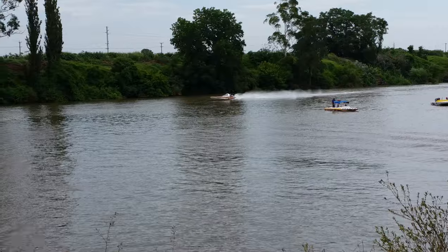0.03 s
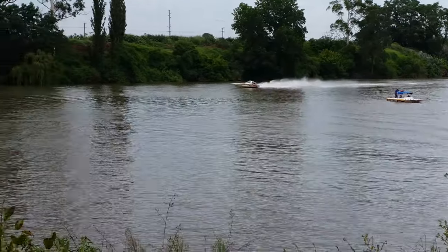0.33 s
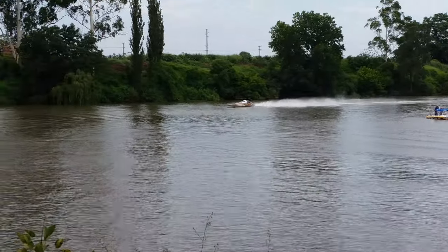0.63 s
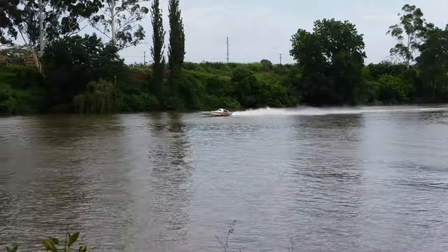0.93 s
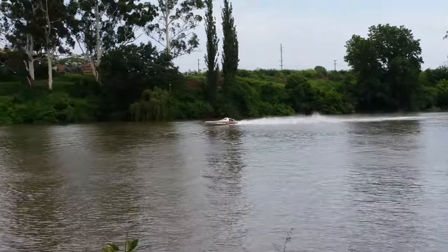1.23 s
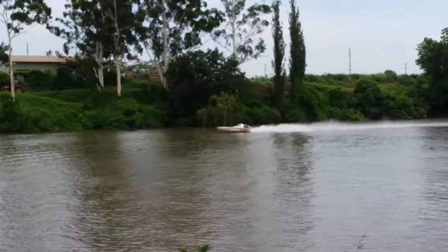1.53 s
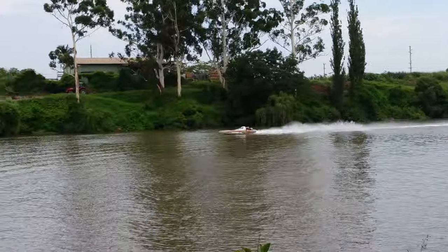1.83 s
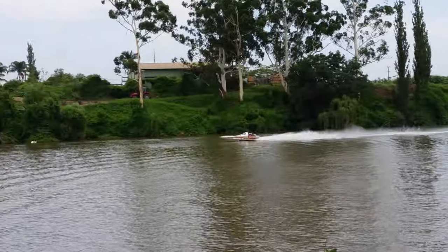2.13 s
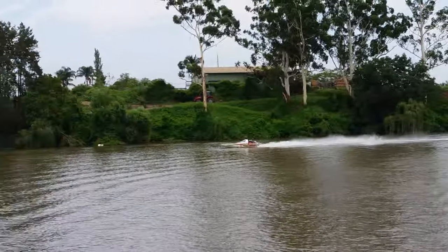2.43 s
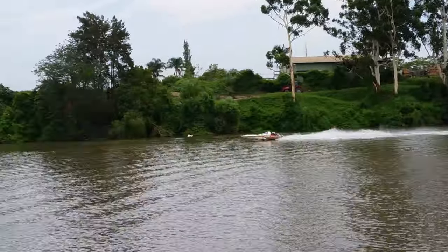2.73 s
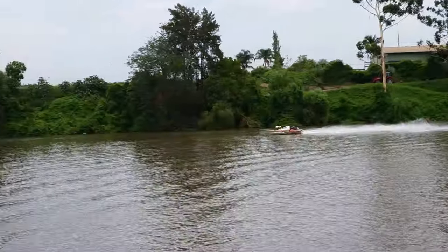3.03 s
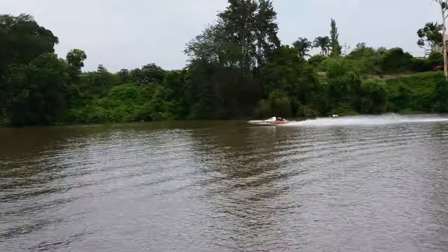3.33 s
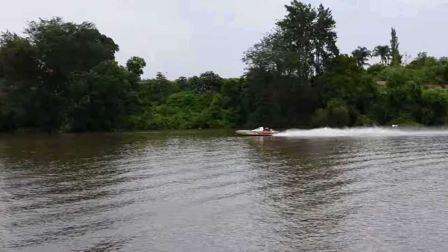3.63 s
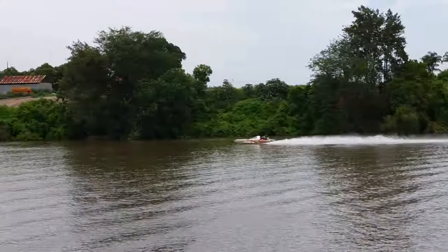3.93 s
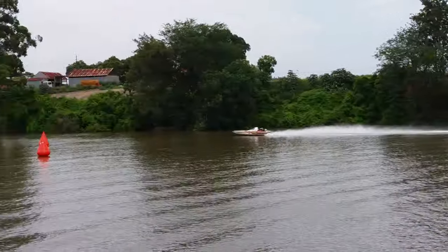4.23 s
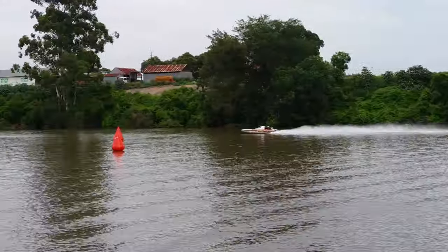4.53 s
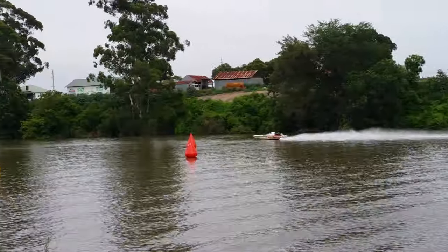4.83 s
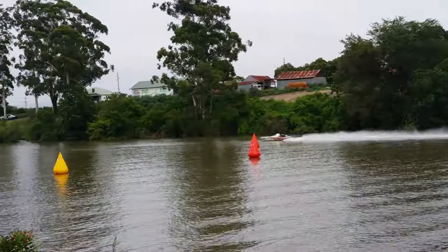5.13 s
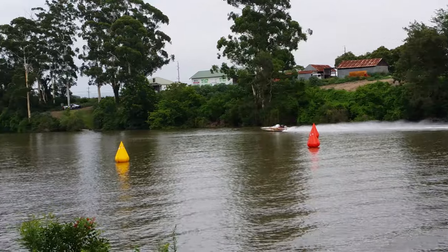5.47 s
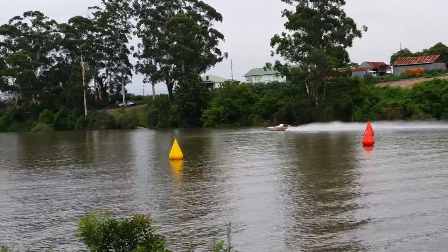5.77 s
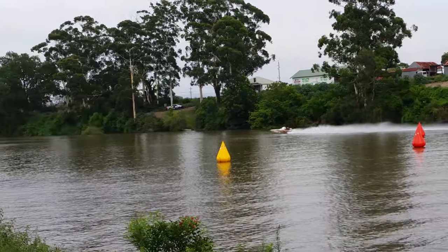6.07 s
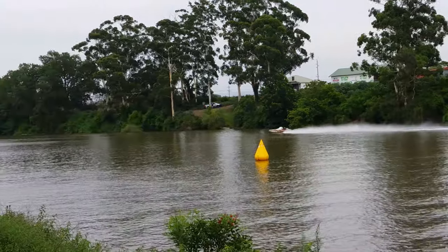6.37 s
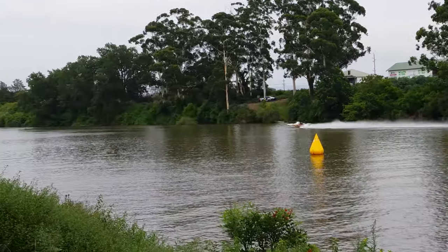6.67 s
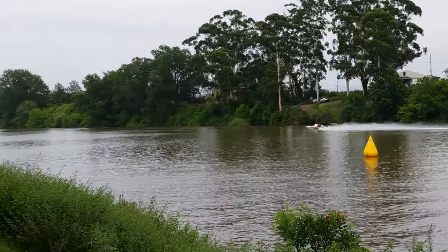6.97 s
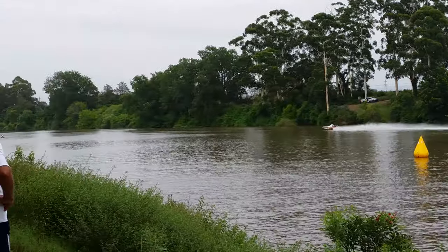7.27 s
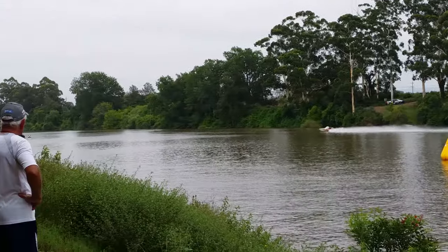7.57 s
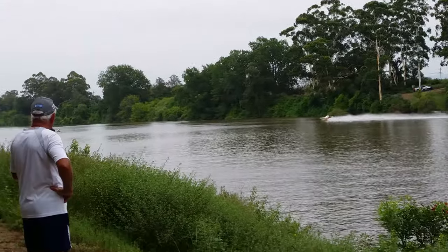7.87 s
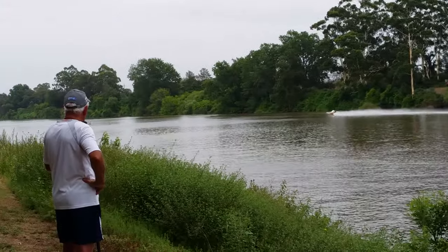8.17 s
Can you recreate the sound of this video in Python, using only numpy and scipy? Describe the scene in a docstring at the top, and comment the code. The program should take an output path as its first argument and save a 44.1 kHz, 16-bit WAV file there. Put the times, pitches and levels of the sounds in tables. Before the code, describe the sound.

After a brief silence, the deep drone of a speedboat's V8 engine rises quickly and stays loud. The open exhausts bark and crackle, and the pitch jumps and dips whenever the propeller leaves the water and bites again. The boat passes midway with a hard blare, throbs and surges, then drops slightly in pitch as it runs on. The riverbank microphone picks up a light echo and a faint rumble of wind.

```python
"""A deep V8 drone swells in and hardens to a blare as a supercharged racing boat runs flat out past a
river bank. Eight open exhaust stacks bark in turn, their colour turning from bow to beam to stern.
The revs race and sag as the hull skips and the propeller leaves the water and bites again.
The exhaust jets tear into a rasping, sizzling crackle that flares on the breeze,
and a faint rumble of wind lies underneath."""
import sys
import numpy as np
from scipy import signal
from scipy.fft import irfft
from scipy.io import wavfile
from scipy.ndimage import uniform_filter1d

SR = 44100
rng = np.random.default_rng(int(sys.argv[2]) if len(sys.argv) > 2 else 0)


def waveform_to_disk(signal):
    """Save audio, clipped to [-1, 1], as 16-bit WAV at the path in sys.argv[1]."""
    frames = np.transpose(np.atleast_2d(signal))
    scaled = np.clip(frames, -1, 1) * 32767
    samples = np.round(scaled).astype(np.int16)
    wavfile.write(sys.argv[1], SR, samples)


N = 366030
TIME = np.arange(N) / SR
TAPS = 8192
BINS = np.fft.rfftfreq(TAPS, 1 / SR)

# side of the boat that faces the bank (time [s], aspect [-1 bow, 0 beam, 1 stern])
ASPECT = [(1.5, -1.15), (2.9, -0.76), (4.3, 0), (7.0, 1)]
# hard surges of the blare (time [s], length [s], boost [dB])
SURGES = [(5.1,.08,3.5),(5.6,0.074,3),(6.05,.09,3.5),(6.51,0.038,4.5)]


def amp(db):
    """Decibels to amplitude."""
    return 10 ** (np.asarray(db) / 20)


def unit_rms(x):
    """Scale to an RMS of one."""
    return x / np.sqrt(np.mean(x ** 2) + 1e-20)


def curves(rows):
    """Each column of a time table at every sample."""
    times, *columns = np.transpose(rows)
    return [np.interp(TIME, times, column) for column in columns]


def spectrum(points):
    """Join points on a log-frequency axis."""
    hz, value = np.transpose(points)
    return np.interp(np.log(BINS + 1), np.log(hz + 1), value)


def smooth(x, size):
    """Two running means of `size` samples."""
    return uniform_filter1d(uniform_filter1d(x, size), size)


def sway(size):
    """Random drift, smoothed over `size` samples."""
    return unit_rms(smooth(rng.standard_normal(N), size))


def noise_pair(apart):
    """White noise, partly shared between left and right."""
    noise = rng.standard_normal((3, N))
    return unit_rms(noise[0] + apart * noise[1:])


def swells(rows, attack_s=0.024):
    """Summed boosts in dB: each rises quickly, holds and lets go, the longer ones more slowly."""
    total = np.zeros(N)
    for start, length, db in rows:
        rise = (TIME - start) / attack_s
        release_s = 0.028 + 0.31 * length
        fall = 1 + (start + length - TIME) / release_s
        total += db * np.clip(np.minimum(rise, fall), 0, 1)
    return total


def colour(x, points):
    """Minimum-phase EQ: it rings after a pulse, never before."""
    log_gain = np.log(amp(spectrum(points)))
    mirrored = np.r_[log_gain, log_gain[-2:0:-1]]
    ring = np.fft.ifft(np.exp(np.conj(signal.hilbert(mirrored)))).real
    return signal.oaconvolve(np.atleast_2d(x), ring[None, :TAPS // 2], axes=1)[:, :N]


def bandpass(x, band_hz):
    """Isolate a band without shifting its phase."""
    return signal.sosfiltfilt(signal.butter(4, band_hz, "band", fs=SR, output="sos"), x)


def at_level(x, db, band_hz):
    """Ride a layer's gain so that one band follows a level curve."""
    power = smooth(bandpass(x.mean(0), band_hz) ** 2, size=3400)
    return x * amp(db) / np.sqrt(abs(power) + 1e-20)


def hull_skips():
    """The propeller races in the air before each landing, then bites and drags the revs down."""
    # skips (landing [s], length of each half [s], race [Hz], sag [Hz])
    skips = [(0.859,0.29,0.59,1.26),(1.309,.15,0,2.57),(1.59,.11,1.2,0.51),(2.41,.12,3.5,3.43),(3,0.2,1.1,1),(3.34,.13,1.41,0.66),(3.611,.15,2.5,2.15),(4.24,0.13,0.29,1),(4.43,.19,0.27,.8),(4.94,0.14,0.48,0.64),(5.549,.09,.5,.6),(5.75,.11,.5,0.21),(6.35,.21,0.48,.8),(6.59,.12,0.7,.75),(7.54,.14,1,1.13)]
    race, sag = np.zeros((2, N))
    for landing, length, race_hz, sag_hz in skips:
        swing = np.sin(np.pi * np.clip((TIME - landing) / length, -1, 1))
        race += race_hz * np.maximum(-swing, 0)
        sag += sag_hz * np.maximum(swing, 0)
    return race, sag


def firings(cycles, jitter_ms, uneven_db):
    """One impulse per firing; the stacks stand in rows, so their delays shift as the boat turns."""
    # stacks in firing order, the near bank uneven (level [dB], lag [ms], extra lag from astern [ms])
    stacks = [(-0.5, -0.28, 0.057), (-2, -0.51, -0.37), (-14, 0.54, 0.77), (1.04, -.19, .25),
              (-7.5, 0.076, 0.17), (-10, 0.31, 0.0062), (-2, -.28, -.25), (-20.5, 0.49, -0.71)]
    count = np.arange(int(cycles[-1] * len(stacks)))
    fired_s = np.interp(count / len(stacks), cycles, TIME)
    db, lag_ms, astern_ms = np.array(stacks)[count % len(stacks)].T
    timing, strength = rng.standard_normal((len(count), 2)).T
    aspect = np.interp(fired_s, *np.transpose(ASPECT))
    delay_ms = lag_ms + astern_ms * aspect + jitter_ms * timing
    arrivals = np.clip((fired_s + delay_ms / 1000) * SR, 0, N - 1).astype(int)
    return np.bincount(arrivals, amp(db + uneven_db * strength), N)


def stack_bark(pulses, lag_hz=170, width_hz=220):
    """Pulses ring the open stacks, whose colour depends on the side that faces the bank."""
    # one exhaust pulse from three sides (frequency [Hz], level [dB])
    bow = [(20,-42),(80,-5.5),(118,16.5),(155,-7.5),(200,-11.5),(320,-10.5),(450,-22.5),(620,-15.5),(770,-20),(950,-20),(1040,-22.5),(1130,-21),(1400,-39.5),(2400,-46),(4000,-62)]
    beam = [(20,-31),(80,-19),(118,-2),(200,0.5),(320,-19.5),(430,-18.5),(560,-16),(780,-21.5),(900,-29.5),(1150,-32),(1450,-24),(2400,-45),(4000,-73)]
    stern = [(20,-50),(80,-12),(118,3),(200,-4.5),(320,-14),(430,-10.5),(560,-6),(680,-15.5),(780,-15.5),(1000,-30),(1130,-25),(1500,-36.5),(2400,-43),(4000,-62)]
    aspect, = curves(ASPECT)
    shares = np.maximum(-aspect, 0), 1 - abs(aspect), np.maximum(aspect, 0)
    bark = sum(share * colour(pulses, side) for share, side in zip(shares, (bow, beam, stern)))
    # all-pass: the low notes lag slightly, rounding each pressure peak
    radius = np.exp(-np.pi * width_hz / SR)
    poles = [1, -2 * radius * np.cos(2 * np.pi * lag_hz / SR), radius ** 2]
    return signal.lfilter(poles[::-1], poles, unit_rms(bark))


def puffs(pulses, decay_ms, rush, apart):
    """A burst of gas noise after each firing, over a steady rush."""
    pole = np.exp(-1000 / (decay_ms * SR))
    flow = unit_rms(signal.lfilter([1], [1, -pole], pulses))
    return (flow + rush) * noise_pair(apart)


def gas_roar(pulses):
    """Turbulent gas leaves the stacks in puffs."""
    # colour of the turbulence (frequency [Hz], level [dB])
    roar_eq = [(60,-18.5),(130,-13.5),(300,-2),(650,-4),(1100,-7),(1600,-10),(2300,-13.5),(3200,-26),(6000,-74.5)]
    return unit_rms(colour(puffs(pulses, decay_ms=4.0, rush=0.52, apart=0.71), roar_eq))


def drifting_echo(x, echo_db, delay_s, wander_ms):
    """The echo path changes as the boat moves, so the overtones beat and waver."""
    path_s = delay_s + wander_ms / 1000 * sway(16000)
    return x + amp(echo_db) * np.array([np.interp(TIME - path_s, TIME, side) for side in x])


def riverside(x, wet_db, t60, build_s, apart):
    """Scatter off water, banks and trees, nearly alike left and right."""
    t = TIME[:SR // 2]
    tail = noise_pair(apart)[:, :len(t)] * amp(-60 * t / t60) * (1 - np.exp(-t / build_s))
    tail /= np.linalg.norm(tail[0])
    return x + amp(wet_db) * signal.oaconvolve(x * np.ones((2, 1)), tail, axes=1)[:, :N]


def mic_ports(x):
    """Stereo image: the left microphone port hears the treble later and duller than the right."""
    # balance (frequency [Hz], left minus right [dB])
    balance = [(90,-1),(140,2),(210,0.5),(330,4.5),(550,5),(1050,9.5),(1400,6),(1900,-6.5),(2700,0),(3300,-12),(5000,-12),(7500,-6),(11500,-14.5),(15000,-4)]
    # phase (frequency [Hz], left lead [rad])
    phase = [(40,0),(200,.3),(520,-.2),(780,-.35),(950,-.8),(1120,-1.8),(1800,-3),(2400,-3.2),(3000,-5.6),(4000,-7),(5000,-6.3),(6900,-9),(11000,-17),(16000,-22)]
    left = amp(spectrum(balance) / 2) * np.exp(0.5j * spectrum(phase))
    pair = np.array([left, 1 / left])
    pair /= np.sqrt(np.mean(abs(pair) ** 2, 0))
    taps = np.fft.fftshift(irfft(pair), axes=1)
    return signal.oaconvolve(x * np.ones((2, 1)), taps, axes=1)[:, TAPS // 2:][:, :N]


def whine(note, cycles, race, db_per_hz=1.5):
    """High orders stand out while the bow faces the bank, more so when the propeller races."""
    # whining overtones (engine order, boost from dead ahead [dB])
    overtones = [(13, 0.5), (16, 0), (22, 1), (24, 3.5), (29, 4.0)]
    ahead = np.clip(-curves(ASPECT)[0], 0, 1)
    for order, db in overtones:
        carrier = np.exp(2j * np.pi * order * cycles)
        partial = smooth(note / carrier, size=2200)
        gain = amp(ahead * (db + db_per_hz * race))
        note = note + 2 * ((gain - 1) * partial * carrier).real
    return note


def throb(note, cycles, at_s=5.45, span_s=0.65, lift_db=1.5, depth_db=4):
    """The mids surge, and beat once per engine cycle while one stack points at the bank."""
    aimed = np.exp(-((TIME - at_s) / span_s) ** 2)
    beat_db = aimed * (lift_db + depth_db * np.cos(2 * np.pi * (cycles - 0.4)))
    mids = bandpass(note, band_hz=(600, 930))
    return note + mids * (amp(beat_db + swells(SURGES)) - 1)


def honk_and_blare(note, choke_db, split_hz=680):
    """The low honk and the high blare each surge and choke around their own level curve."""
    # base levels of the exhaust note (time [s], honk [dB], blare [dB])
    levels = [(.95,-26,-22.5),(2.2,-26.5,-24),(2.8,-30,-23),(3.5,-26,-25),(4.8,-24,-24),(5.7,-19.5,-22.5),(6.35,-19,-25.5),(7.05,-17,-23.5),(8.3,-21,-24.5)]
    honk_db, blare_db = curves(levels)
    surge_db = swells(SURGES)
    low = signal.sosfiltfilt(signal.butter(6, split_hz, fs=SR, output="sos"), note)
    honk = at_level(low, honk_db - choke_db + 0.33 * surge_db, band_hz=(480, split_hz))
    blare = at_level(note - low, blare_db - 0.85 * choke_db + surge_db, band_hz=(split_hz, 1200))
    return amp(-2.16) * honk + amp(-0.5) * blare


def drone(note, cycles, choke_db):
    """The strongest low orders swell and fade with load and direction."""
    # base levels of the drone (time [s], 3rd [dB], 5th [dB], 8th [dB], 11th order [dB])
    levels = [(.77,-18,-19.5,-31,-33),(.97,-12,-22,-30,-47),(1.5,-14.5,-22,-25,-37),(2.2,-12.5,-22,-21,-34),(2.6,-18,-21,-21.5,-36),(2.8,-17.5,-23.5,-23.5,-32),(3.7,-21,-23,-21,-28),(4.7,-19.5,-24.5,-17.5,-27),(5.5,-22.5,-23.5,-22.5,-30),(6.5,-20.5,-20,-24,-28),(7.2,-27,-23.5,-29,-22.5),(8.2,-24,-22,-38,-24)]
    # the engine lugs and booms after a hard landing (time [s], length [s], boost [dB])
    lugs = [(2.57,0.054,3.5),(3.64,0.088,2)]
    load_db = swells(lugs) - 0.45 * choke_db
    for order, db in zip((3, 5, 8, 11), curves(levels) + load_db):
        carrier = np.exp(2j * np.pi * order * cycles)
        partial = smooth(note / carrier, size=2200)
        partial_rms = np.sqrt(2) * smooth(abs(partial.mean(0)), size=1500)
        gain = amp(db) / (partial_rms + 1e-6)
        note = note + 2 * ((gain - 1) * partial * carrier).real
    return note


def exhaust(pulses, cycles, race, choke_db):
    """The engine note: bark and roar cross the river and echo off its ragged far bank."""
    gas = stack_bark(pulses) + amp(-22) * gas_roar(pulses)
    gas = drifting_echo(gas, echo_db=-6.5, delay_s=0.045, wander_ms=1.154)
    note = mic_ports(riverside(gas, wet_db=-21, t60=1.0, build_s=0.071, apart=0.33))
    note = signal.sosfilt(signal.butter(1, 4, "high", fs=SR, output="sos"), note)  # block DC
    note = whine(note, cycles, race)
    note = throb(note, cycles)
    note = honk_and_blare(note, choke_db)
    return drone(note, cycles, choke_db)


def breeze_levels(closest_s=4.47, air_db_per_s=1.32):
    """Rasp and sizzle drift and flare together; moving air sways the sizzle further."""
    # base level of the rasp (time [s], level [dB])
    drift = [(.97,-35.5),(1.06,-36.5),(2.04,-31.5),(2.15,-37.5),(2.64,-36),(2.73,-31.5),(3.33,-31.5),(3.43,-34.5),(3.65,-32.5),(5.39,-33),(5.86,-36),(6.15,-30.5),(6.22,-37.5),(7.1,-35.5),(7.85,-34.5),(8.1,-40.5)]
    # flares of crackle carried over by the breeze (time [s], length [s], boost [dB])
    flares = [(.97,0.032,6),(1.25,0.19,4),(1.52,0.1,4.5),(1.73,.21,4),(2.262,0.096,6),(3.142,0.067,3),(3.255,0.059,3.5),(3.967,.1,2.5),(4.37,0.024,2.3),(4.63,.039,3.1),(5.22,.165,4),(5.535,.085,6),(5.72,.038,6.5),(5.881,0.036,5.5),(6.073,0.045,3.5),(6.85,.17,5),(7.125,0.098,7.5),(7.438,.17,6),(7.77,.1,0.6)]
    steady_db, = curves(drift)
    flare_db = swells(flares) + sway(1500)
    sizzle_db = -41 + 1.4 * (steady_db + 35) + 1.5 * flare_db
    air_loss_db = air_db_per_s * abs(TIME - closest_s)  # distance dulls the sizzle
    return steady_db + flare_db, sizzle_db - air_loss_db


def near_echoes(x):
    """Short reflections off the near bank comb the treble."""
    # reflections (delay [ms], level [dB])
    echoes = [(1.9, -21.5), (3.3, -19), (6.1, -17)]
    taps = np.zeros(TAPS)
    taps[0] = 1
    for ms, db in echoes:
        taps[round(ms * SR / 1000)] += amp(db)
    return signal.oaconvolve(x, taps[None], axes=1)[:, :N]


def crackle(pulses, wild_db):
    """The jets tear, some firings much harder than others, and each breaks into tiny snaps."""
    # rasp from ahead, rasp from astern and the sizzle on top (frequency [Hz], level [dB])
    bow_eq = [(700,-22.5),(1400,2.5),(2200,2.5),(2650,-3.5),(3500,0.5),(4300,-3),(5100,-2),(7000,-8),(9000,-17),(14000,-38.5)]
    stern_eq = [(700,-16),(1400,-10.5),(2200,-5.5),(2550,-3.5),(3300,1),(4300,-3.5),(5100,-3),(7000,-12.5),(9000,-14),(14000,-46)]
    sizzle_eq = [(4000,-36.5),(7000,-5.5),(8800,-8.5),(11200,-2),(13000,-11.5),(15800,-10.5)]
    rasp_db, sizzle_db = breeze_levels()
    astern = np.clip((curves(ASPECT)[0] + 1) / 2, 0, 1)
    tears = pulses ** 1.4 * amp(wild_db * np.clip(rng.standard_normal(N), -2, 2))
    snaps = sway(16)
    gas = near_echoes(puffs(tears, decay_ms=3.75, rush=0.38, apart=1.0))
    # a glance off the water phases the hiss
    gas = drifting_echo(gas, echo_db=-12.5, delay_s=0.0014, wander_ms=0.072)
    coarse, fine = gas * amp(1.5 * snaps), gas * amp(2.85 * snaps)
    rasp = (1 - astern) * colour(coarse, bow_eq) + astern * colour(coarse, stern_eq)
    rasp = at_level(mic_ports(rasp), rasp_db, band_hz=(2500, 7000))
    sizzle = at_level(mic_ports(colour(fine, sizzle_eq)), sizzle_db, band_hz=(8000, 15500))
    return amp(-0.95) * rasp + amp(-0.2) * sizzle


def wind(level_db, gust_db):
    """Gusts on the microphone make a faint, lumpy rumble."""
    # colour of the rumble (frequency [Hz], level [dB])
    rumble_eq = [(8,-23),(28,-4),(45,2),(100,16),(200,-28),(600,-51),(4000,-65)]
    gusts = amp(-gust_db * sway(6000))
    return amp(level_db) * unit_rms(colour(noise_pair(apart=0.35), rumble_eq) * gusts)


def scene():
    """One train of firings drives the exhaust note and the crackle, over the wind."""
    # engine speed heard between skips, falling as the boat passes (time [s], four-stroke cycles [Hz])
    revs = [(.87,41.3),(1.31,38.7),(1.82,38.3),(2.3,38.8),(2.55,36.7),(2.69,41.8),(2.97,40.6),(3.93,40.2),(4.08,41.3),(5.4,39.9),(5.63,40.4),(6.95,37.5),(7.2,38.6),(7.86,37.8)]
    race, sag = hull_skips()
    chop_hz = 0.08 * sway(2500)  # small waves make the revs waver
    speed_hz = curves(revs)[0] + race - sag + chop_hz
    collapse_hz_per_s = np.maximum(-np.gradient(smooth(race - sag, size=1500)) * SR, 0)
    choke_db = 9 * (collapse_hz_per_s / 113) ** 2  # the note chokes when the revs collapse
    cycles = np.cumsum(speed_hz) / SR
    pulses = firings(cycles, jitter_ms=0.04, uneven_db=0.55)
    note = exhaust(pulses, cycles, race, choke_db)
    return note + crackle(pulses, wild_db=2.0) + wind(level_db=-51, gust_db=4.0)


def record(dry):
    """The sound cuts in from silence and swells; peaks are rounded and the extreme treble is cut."""
    start_s, cutoff_hz = 0.71, 15850
    gate = np.clip((TIME - start_s) / 0.0033, 0, 1)
    fade = np.clip(0.13 + (TIME - start_s) / 0.33, 0, 1) ** 1.13
    opened = dry * fade * gate
    rounded = opened / (1 + opened ** 8) ** (1 / 8)
    lowpass = signal.firwin(711, cutoff_hz, window=("kaiser", 10), fs=SR)
    return signal.oaconvolve(rounded, lowpass[None], "same")


dry = scene()
out = record(dry)
waveform_to_disk(out)
```